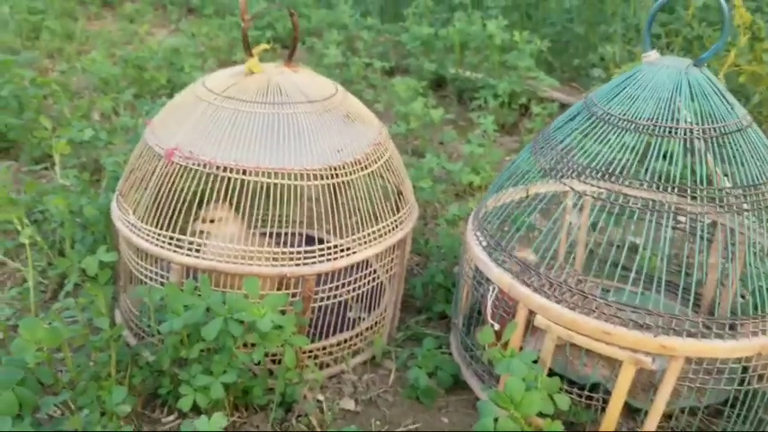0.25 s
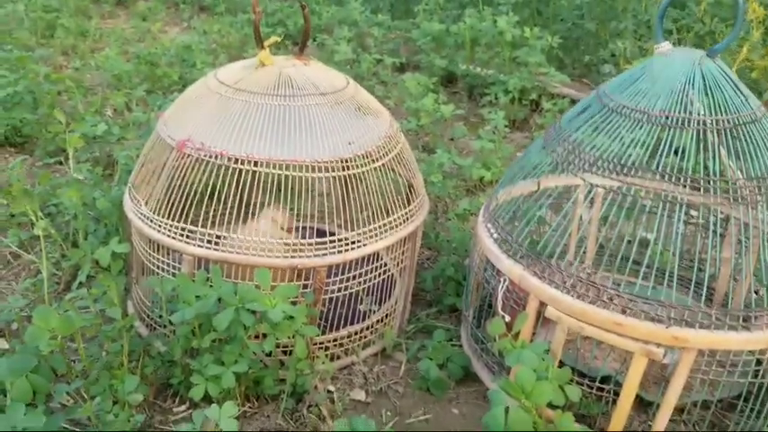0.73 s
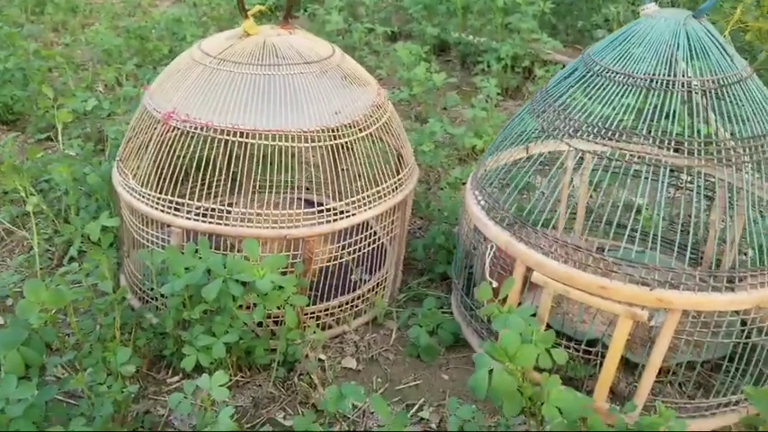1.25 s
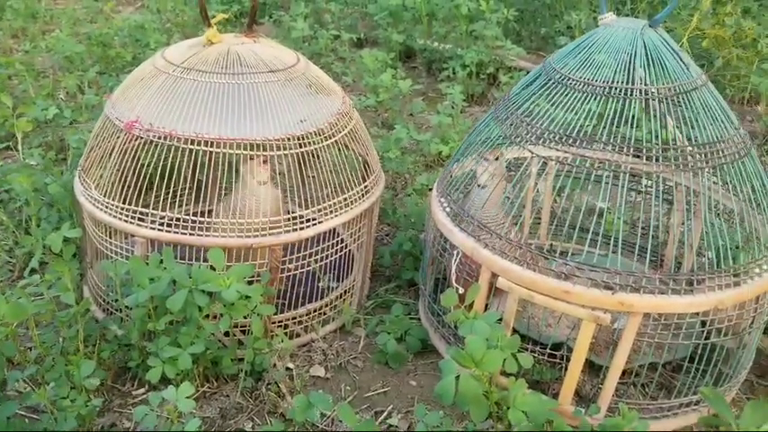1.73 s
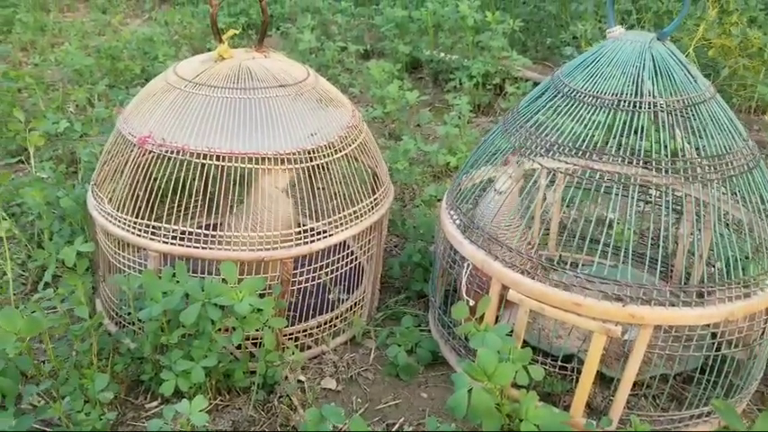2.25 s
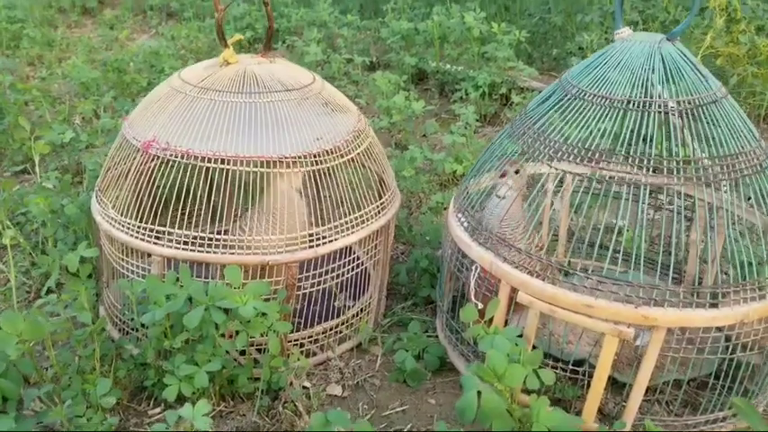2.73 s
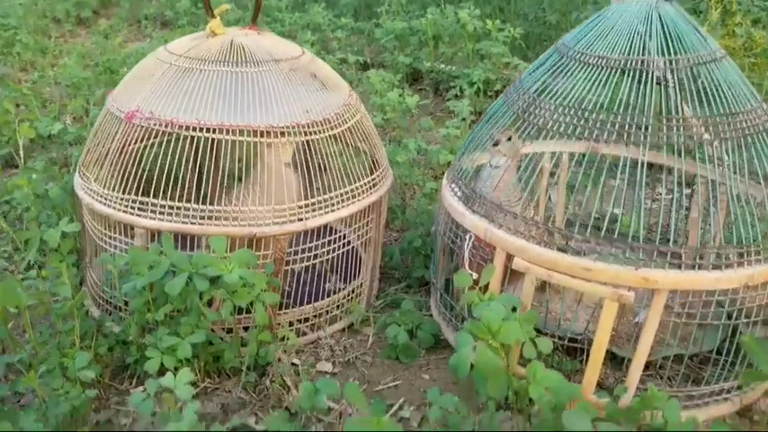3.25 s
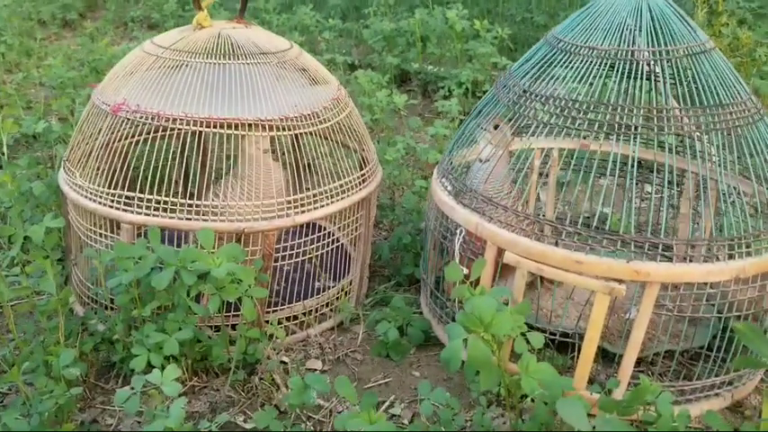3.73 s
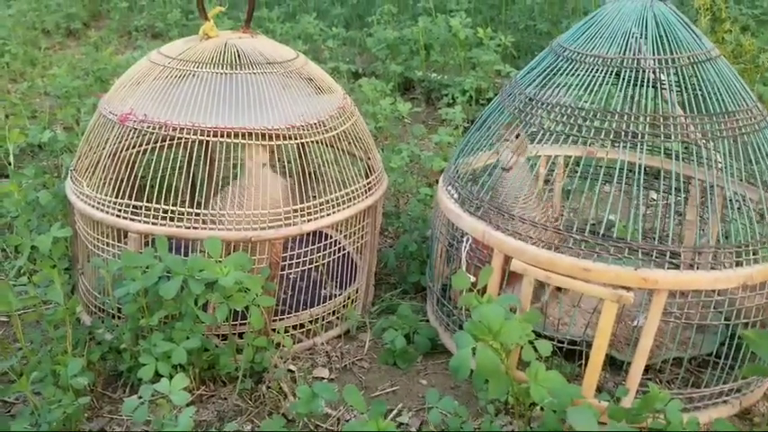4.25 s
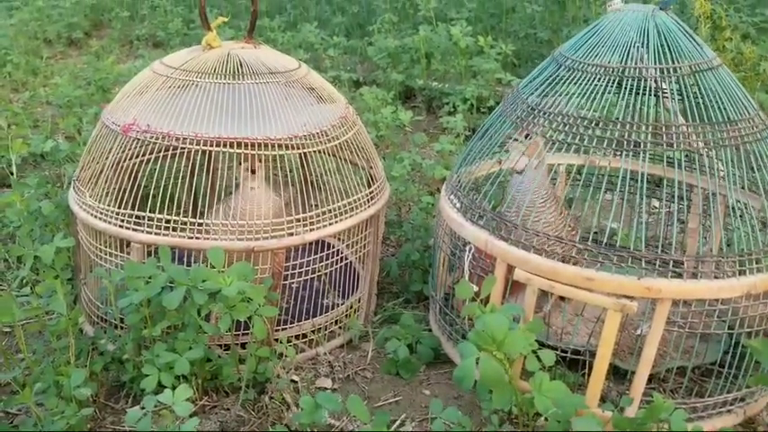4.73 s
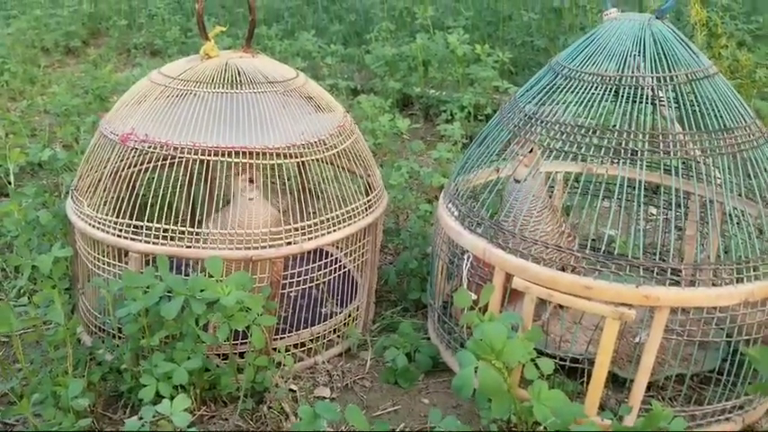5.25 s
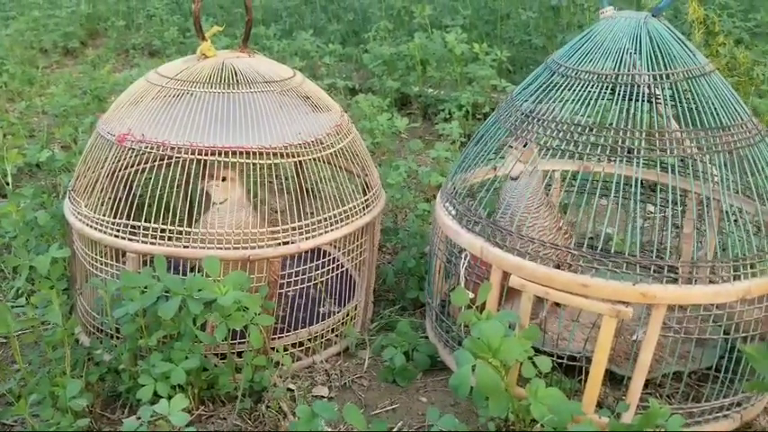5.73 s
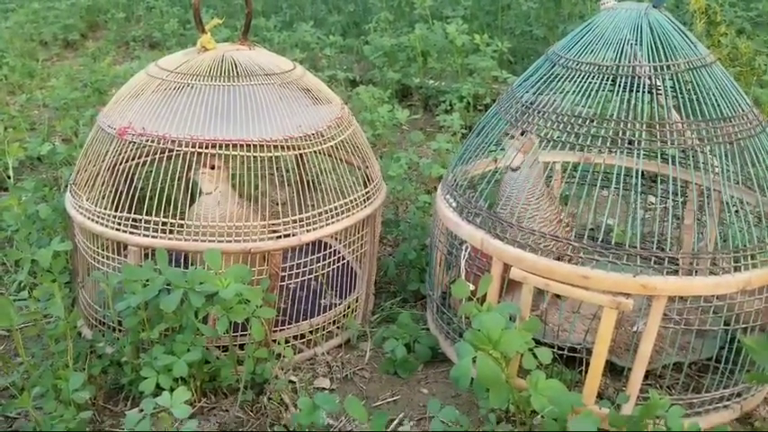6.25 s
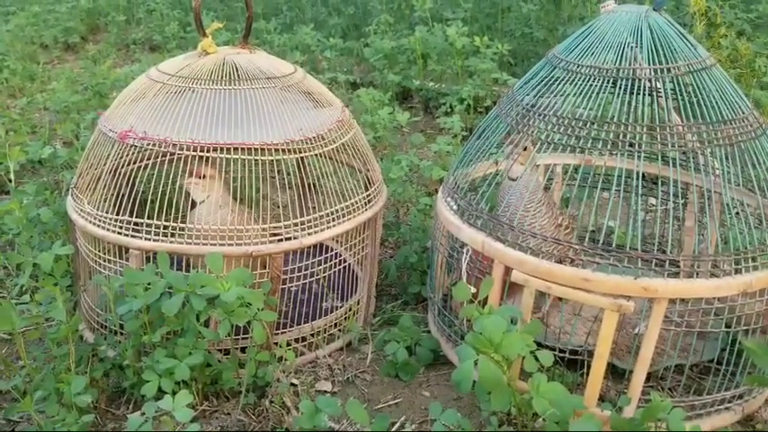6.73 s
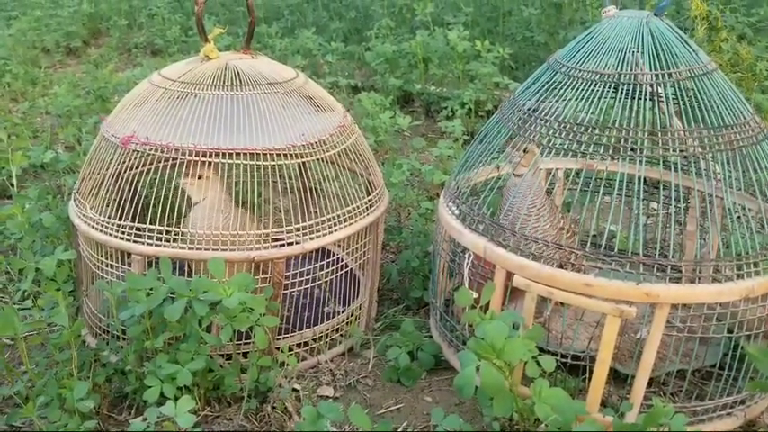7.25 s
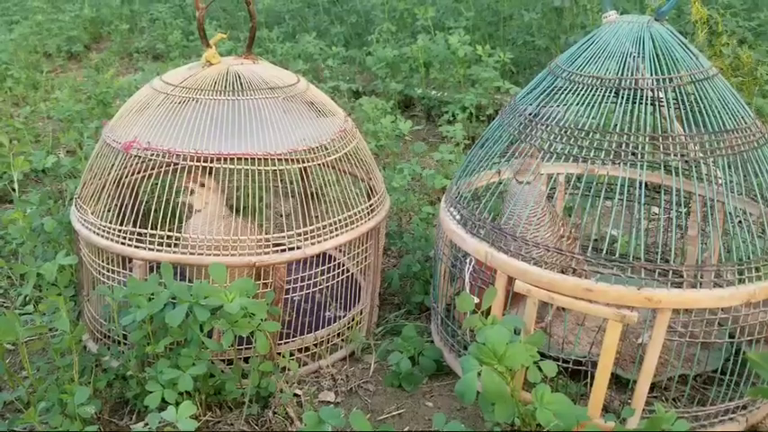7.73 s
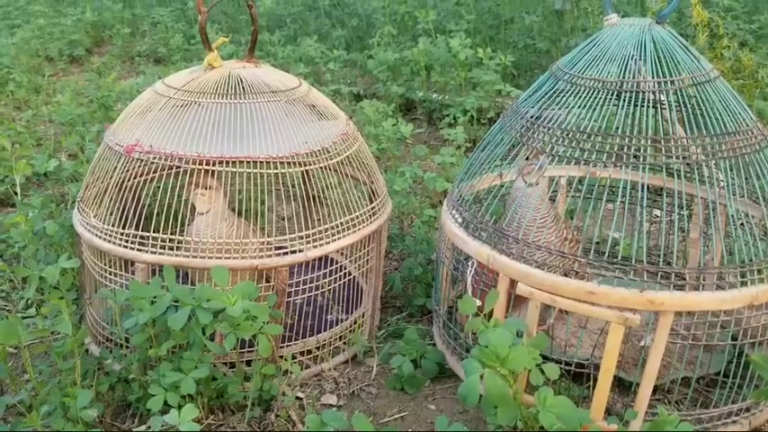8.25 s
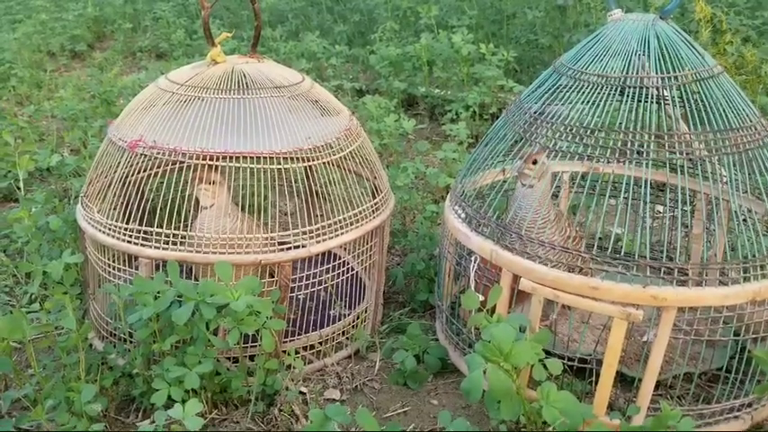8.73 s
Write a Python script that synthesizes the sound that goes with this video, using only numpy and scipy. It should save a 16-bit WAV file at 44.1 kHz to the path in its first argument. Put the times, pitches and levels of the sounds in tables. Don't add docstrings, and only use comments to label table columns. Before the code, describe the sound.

Close stereo outdoor pickup of caged ground birds. The first second holds soft rumble, distant rough caws and dull handling taps. Then a sharp whistle breaks in and a dense duet takes over: piercing piping about twice a second, snapping double cries and quick throaty clucks between. The background drops away beneath the calls. After about seven seconds only spaced piping and thin whistles remain, with slight short echoes from cage and trees.

```python
import sys
import numpy as np
from scipy import signal
from scipy.io import wavfile
from scipy.ndimage import uniform_filter1d

SR = 44100
rng = np.random.default_rng(int(sys.argv[2]) if len(sys.argv) > 2 else 0)


def voltage_ratio(level):
    return 10 ** (np.asarray(level, float) / 20)


def output_pcm(signal):
    pcm = np.clip(np.atleast_2d(signal).T, -1, 1) * 32767
    wavfile.write(sys.argv[1], SR, np.round(pcm).astype(np.int16))


N = 396018

# time_s, rumble_db, air_db
GROUND_LEVELS = [(0, -47.5, -60.5), (.9, -48, -67.5), (1.35, -51.5, -64.5), (2.37, -66, -78.5),
                 (3.05, -58, -66), (3.85, -74, -72.5), (6.9, -70, -74), (7.6, -57, -73.5),
                 (8.98, -55, -72.5)]
# freq_hz, level_db
RUMBLE_SPECTRUM = [(35, -40.5), (70, -21), (110, -11), (220, 1), (400, -13.5), (600, -36)]
# freq_hz, level_db
AIR_SPECTRUM = [(400, 5.5), (850, -7), (1600, -5), (6800, -13.5), (7300, -7), (8500, -7.5), (9000, -40),
                (15500, -54)]
# freq_hz, level_db
ENGINE_ORDERS = [(52, -1.5), (104, -1), (155, -12), (207, -11.5)]
# level_db, t60_s
ECHO_TAILS = [
    (-28, .1),
    (-38, .6),
]

# start_s, length_s, pitch_hz, level_db, dulling_db_per_octave away from 1.6 kHz
CROW_CAWS = [
    (0.027, 0.37, 468.6, -44, -0.5),
    (1.02, 0.35, 494.6, -45, 2.5),
    (4.978, .35, 492, -53, 3.5),
    (7.242, 0.47, 487, -69, 13),
]
# freq_hz, level_db
CROW_SPECTRUM = [(900, -15), (1400, 0.5), (1850, -3.5), (2300, -14), (3700, -17.5), (5500, -14),
                 (8000, -24), (10500, -18)]
CAW_ROUGH, ROUGH_PER_DB, CAW_ARCH, CAW_EDGE_DB = .5, .05, .07, -17
# time_s, pitch_hz, level_db
FAR_CALLS = [
    [(.7, 1900, -53), (.73, 1800, -53), (.78, 1250, -63), (.83, 850, -53)],
    [(8.4, 1960, -66.5), (8.58, 2050, -72)],
]

# start_s, peak_db
KNOCK_EVENTS = [(0.141, -40), (0.215, -34), (0.244, -33), (0.319, -30.5), (0.339, -32), (0.497, -33),
                (0.51, -31), (0.693, -36), (0.707, -33), (0.744, -33.5), (0.822, -37.5), (0.85, -38),
                (1.057, -36), (1.076, -34.5), (1.204, -36), (1.224, -37), (2.948, -36), (3.047, -39.5),
                (3.084, -41.5), (3.204, -39), (3.244, -42), (3.281, -43.5)]
# freq_hz, width_hz, level_db
SHELL_MODES = [(114.4, 120, 1), (325.8, 260, 10), (673, 1800, -3.5), (2380, 2900, -22.5)]

# start_s, length_s, pitch_hz, rise_hz, level_db
LOW_WHISTLES = [(1.16, 0.13, 3790, 53, -13.5), (2.08, 0.058, 3820, 150, -28), (2.78, 0.07, 3750, 260, -21),
                (3.42, 0.14, 3790, 270, -27.5), (4.005, 0.086, 3950, 190, -26.5),
                (4.58, 0.094, 3880, 190, -27.5), (5.15, 0.079, 3900, 123, -24),
                (5.82, 0.048, 3900, 25, -21.5), (6.45, .055, 3900, 250, -19),
                (6.988, 0.19, 3940, 54, -20.5), (7.612, 0.051, 3980, 106, -19),
                (8.205, 0.086, 3860, 258, -19.5), (8.805, 0.076, 3990, 40, -19)]
# start_s, length_s, pitch_hz, level_db
HIGH_WHISTLES = [(1.279, 0.029, 4160, -13.5), (2.092, 0.13, 4200, -25), (2.83, 0.12, 4240, -24.5),
                 (3.531, 0.056, 4370, -27.5), (4.067, 0.12, 4350, -28.5), (4.631, 0.13, 4340, -26),
                 (5.2, 0.12, 4270, -24), (5.86, 0.14, 4330, -25), (6.5, 0.122, 4430, -27),
                 (7.145, 0.05, 4400, -27), (7.647, 0.17, 4360, -16.5), (8.26, .13, 4380, -20.5),
                 (8.841, .16, 4386, -22)]
# low_pan_db, low_lead_rad, high_pan_db, high_lead_rad (pan is left minus right)
WHISTLE_SIDES = [(6.5, -0.35, -4, -.9), (8, -0.28, -11.5, .3), (0.5, -0.435, 1.5, -0.15),
                 (3, -0.19, 0.5, -0.85), (1, 0.32, 5, -1.8), (2, 0, -1, -1.2), (-5, 0, 6, -1.08),
                 (-1, 0.11, -0.5, -1.6), (-2.5, 0.34, -6, 1), (0, 0.38, -9, 0.7), (1.5, .4, -10.5, -1.7),
                 (1.5, .4, -19, 0.28), (4, 0.25, -33, 0.94)]
# freq_hz, level_db re whistle
BREATH_SPECTRUM = [(500, -50.5), (1500, -42.5), (3300, -41.5), (4300, -22), (5200, -28.5), (6200, -42),
                   (8500, -48.5), (15000, -46.5)]
# start_s, peak_db
THROAT_THUMPS = [(1.142, -23), (2.062, -31.5), (2.751, -37), (3.397, -40.5), (3.986, -48), (4.559, -51),
                 (5.12, -39), (6.428, -40.5), (6.962, -44), (7.591, -30.5), (8.176, -43), (8.782, -29.5)]
# attack_s, release_s, scoop_hz, fade_db
LOW_SHAPE, HIGH_SHAPE = (0.0056, 0.0448, 170, 3), (.022, 0.0636, 59, 1)
HIGH_RISE_HZ, WHISTLE_SCOOP_S, WAVER = -38, .006, .005

# start_s, first_hz, sag_hz, level_db
PIPE_NOTES = [(1.638, 2970, 16, -10.5), (2.174, 2995, 25, -14), (2.642, 3008, 23, -12.5),
              (3.161, 3013, 12, -11), (3.707, 3010, 16, -15), (4.271, 3011, 15, -13.5),
              (4.82, 3023, 19, -13), (5.361, 3006, 32, -12), (5.877, 3025, 66, -12),
              (6.426, 2996, 51, -11.5), (7.145, 2958, 37, -13), (7.791, 2949, 22, -9.5)]
# p2_db, p3_db, p4_db, p5_db
PIPE_UPPER = [(-9.0, -18.0, -24.0, -27.0), (-9.0, -23.0, -26.0, -30.0), (-9.0, -26.0, -32.0, -32.0),
              (-17.0, -25.0, -24.0, -31.0), (-13.0, -22.0, -23.0, -25.0), (-12.0, -17.0, -18.0, -26.0),
              (-15.0, -16.0, -16.0, -21.0), (-21.0, -19.0, -15.0, -23.0), (-17.0, -17.0, -16.0, -23.0),
              (-15.0, -16.0, -14.0, -25.0), (-12.0, -16.0, -13.0, -28.0), (-16.0, -16.0, -16.0, -28.0)]
# p1_db, p2_db, p3_db, p4_db, p5_db
PIPE_PANS = [(-8.0, -17.0, 3.0, -2.0, -8.0), (-9.0, -18.0, 5.0, 1.0, -5.0), (-9.0, -19.0, 7.0, 10.0, -7.0),
             (-7.0, -4.0, 5.0, -4.0, -14.0), (-4.0, -4.0, -8.0, -1.0, -1.0), (-6.0, -3.0, -5.0, -3.0, -1.0),
             (-7.0, 1.0, -4.0, -5.0, -4.0), (-6.0, 6.0, -5.0, -4.0, -2.0), (-5.0, 0.0, 3.0, -3.0, -5.0),
             (-6.0, -1.0, 3.0, -2.0, -3.0), (-6.0, -1.0, 6.0, 1.0, 7.0), (-10.0, -2.0, 11.0, 1.0, 7.0)]
PIPE_LEADS = [(1.3, -0.4, 1.0, -1.2, -1.7), (1.0, -0.7, 2.0, -0.4, 2.4), (0.8, -1.7, 3.1, -1.1, 3.1),
              (0.9, -2.6, 0.1, 1.3, -2.8), (1.1, 2.6, 1.0, -2.5, -0.2), (1.2, 3.0, 2.8, -3.1, -0.9),
              (1.8, -3.1, 2.6, -2.8, -0.8), (2.0, -0.6, 2.2, -2.9, -0.2), (2.6, -0.2, -2.8, -1.5, 1.7),
              (2.6, 0.0, -2.6, -1.1, 1.2), (2.7, 1.2, -2.8, -0.4, 2.3), (2.6, 0.8, 3.1, -1.1, 1.3)]
PIPE_MIDLINES = [-30, -45, -50, -45, -45, -42, -38, -45, -45, -45, -45, -50]
PIPE_RASP = [-13, 0, -3, -10, -25.5, -14, -23.5, -15.5, -15.5, -25.5]
PIPE_S, PIPE_LEAD_DB, PIPE_TAIL_DB = .086, -8.5, -19
PIPE_FADE_DB, FADE_DB_PER_S = -5.5, 0.86

# first_s, second_s, pitch_hz, first_db, second_db
CRY_NOTES = [(1.476, 1.513, 2614, -14, -15), (2.275, 2.314, 2697, -11, -17), (2.806, 2.849, 2693, -10, -13),
             (3.354, 3.395, 2682, -9, -16.5), (3.921, 3.963, 2683, -9.5, -16.5),
             (4.465, 4.508, 2677, -9, -15), (5.506, 5.555, 2660, -7.5, -12.5),
             (6.054, 6.1, 2670, -7, -11.5)]
# open_db, open_s, break_db, snap_db, second_length_s
CRY_RASPS = [(-15.5, .059, -20, -17, .04), (-22, .07, -24, -22, .045), (-17, .048, -24, -19, .047),
             (-16.5, .053, -23, -22, .047), (-18, .05, -24, -22, .047), (-16, .05, -24, -20, .047),
             (-15.5, .054, -23, -21, .047), (-14.5, .05, -23, -21, .047)]
# p2_db, p3_db, p4_db, p5_db
CRY_FIRST_UPPER = [(-2.0, -26.0, -22.0, -17.0), (-8.0, -37.0, -30.0, -31.0), (-17.0, -38.0, -35.0, -41.0),
                   (-13.0, -37.0, -36.0, -36.0), (-13.0, -42.0, -29.0, -32.0), (-13.0, -40.0, -34.0, -30.0),
                   (-16.0, -41.0, -29.0, -27.0), (-16.0, -37.0, -36.0, -32.0)]
# p2_db, p3_db, p4_db, p5_db
CRY_SECOND_UPPER = [(1.0, -19.0, -12.0, -16.0), (-7.0, -32.0, -20.0, -27.0), (-14.0, -28.0, -23.0, -37.0),
                    (-15.0, -28.0, -18.0, -26.0), (-15.0, -28.0, -19.0, -25.0),
                    (-17.0, -27.0, -22.0, -26.0), (-20.0, -26.0, -21.0, -25.0),
                    (-19.0, -26.0, -22.0, -21.0)]
# p1_db, p2_db, p3_db, p4_db, p5_db
CRY_PANS = [(-7.0, -22.0, 4.0, -9.0, -16.0), (-11.0, -18.0, -6.0, -0.0, -6.0),
            (-9.0, -3.0, -7.0, -2.0, -11.0), (-6.0, -14.0, -3.0, 7.0, -4.0), (-5.0, -10.0, -1.0, 4.0, -4.0),
            (-6.0, -6.0, -3.0, 7.0, -4.0), (-5.0, -6.0, -7.0, 5.0, -5.0), (-4.0, -7.0, -4.0, 6.0, -4.0)]
CRY_LEADS = [(-0.3, 0.8, -2.6, -2.8, -1.7), (-1.0, -0.2, 1.1, 3.0, 2.3), (-1.0, -1.2, -1.9, -3.0, 2.6),
             (-0.7, -1.1, 0.8, -0.8, -2.1), (-0.6, -0.8, -0.1, -1.1, -2.2), (-0.9, -0.9, -0.9, -3.0, 1.2),
             (-0.9, -1.4, -1.6, 2.8, 1.6), (-0.8, -2.0, -1.2, 2.9, 1.7)]
CRY_RASP = [-16, -2, -6, -12.5, -28, -28, -20.5, -32.5, -25.5, -24.5]
BREAK_S, FIRST_SAG_HZ, FALL_HZ, FALL_DB = .0145, 15, 230, -3

# start_s, peak_db of the lowest partial, effort_db of the second partial above it
CLUCK_EVENTS = [(1.7449, -23, -3.5), (1.831, -27.5, -12), (1.9125, -30.5, -15.5), (1.9944, -39, -28.5),
                (2.4863, -31.5, 14.5), (2.5787, -28.5, 8.5), (3.026, -30, 14.5), (3.1201, -26.5, 7),
                (3.2046, -30.5, -0.5), (3.571, -24, 6.5), (3.6652, -25, 3.5), (3.7524, -32, 0.5),
                (4.136, -24, 7), (4.225, -22.5, 1), (4.3181, -29, -6.5), (4.6808, -23, 6),
                (4.7707, -23, 2.5), (4.8651, -28, -7.5), (4.9282, -26.5, -16), (4.994, -26, -19.5),
                (5.0868, -30, -28), (5.7144, -25, 5), (5.802, -22, -4), (6.2684, -25, 7.5),
                (6.3582, -22, 0.5), (6.4441, -30, -12.5), (6.5096, -29.5, -10.5), (6.5763, -26, -15.5),
                (6.6635, -31, -21.5), (6.746, -34.5, -40)]
# slide_db, ring_db
CLUCK_COLOURS = [(0, 4), (-8, 9), (-8, 12), (-8, 20), (-8, 3), (-8, 2), (1, 0), (0, 0), (-3, 0), (1, 0),
                 (1, 0), (-3, 0), (1, -1), (1, -1), (-3, -1), (1, -1), (1, -1), (-3, -1), (-5, 1), (-5, 3),
                 (-5, 5), (1, -2), (1, -2), (1, -3), (1, -3), (-3, -3), (-5, 0), (-5, 0), (-5, 3), (-5, 9)]
CLUCK_S, CLUCK_S_PER_DB = .047, .0005
UPPER_DB, UPPER_PER_DB = -19, 0.8741

# hook_hz, hook_s, dive_hz, accent_db, breath_db
PIPE_EDGE = (25, .005, 170, .5, -37)
FIRST_EDGE = (150, .002, 300, .5, -31)
SECOND_EDGE = (120, .002, 110, 3, -30)
CRY_FACING_DB, FACING_DB, BRIGHT = -11.5, -37, 0.36
SWING, SWING_PER_DB = .05, .013


def evened(x):
    return x / np.sqrt(np.mean(abs(x) ** 2) + 1e-20)


def wandering(count, span):
    noise = rng.standard_normal(count)
    return evened(uniform_filter1d(uniform_filter1d(noise, span), span))


def filtered(x, order, hz, kind):
    return signal.sosfilt(signal.butter(order, hz, kind, fs=SR, output="sos"), x)


def read(points, hz):
    f, value = np.transpose(points)
    return np.interp(np.log(hz + 1), np.log(f + 1), value)


def unroll(rows):
    s, *columns = np.transpose(rows)
    t = np.arange(s[0], s[-1], 1 / SR)
    return [np.interp(t, s, c) for c in columns]


def add(mix, start_s, sound):
    part = mix[:, round(start_s * SR):][:, :sound.shape[1]]
    part += sound[:, :part.shape[1]]


def hump(length_s, rise, power):
    u = np.linspace(0, 1, round(length_s * SR))
    bend = np.log(.5) / np.log(np.clip(rise, .05, .95))
    return abs(np.sin(np.pi * u ** bend)) ** power


def partial(hz, rough=0., width_hz=300.0, pan_db=0., lead_rad=0., apart=0., loose=False):
    apart, rough = np.clip(apart, 0, 1), np.clip(rough, 0, 1)
    noise = np.exp(2j * np.pi * rng.random((2, len(hz) + 300), np.float32))
    r = np.exp(-np.pi * width_hz / SR)
    shiver = evened(signal.lfilter([1], [1, -2 * r, r * r], noise)[:, 300:])
    shiver[0] = np.sqrt(1 - apart) * shiver[1] + np.sqrt(apart) * shiver[0]
    carrier = np.exp(2j * np.pi * (np.cumsum(hz) / SR + loose * rng.random()))
    line = carrier * (np.sqrt(1 - rough) + np.sqrt(rough) * shiver)
    sides = np.array([voltage_ratio(pan_db) * np.exp(1j * lead_rad), 1])
    return 2 * (line * sides[:, None]).real / np.linalg.norm(sides)


def breath(count, low_hz):
    noise = rng.standard_normal((3, count))
    return evened(filtered(noise[:2] + noise[2], 2, low_hz, "high"))


def hiss(spectrum, patchy_db, same):
    frames, hz = N // 512 + 5, np.fft.rfftfreq(1024, 1 / SR)
    a, b, c, d, patches = rng.standard_normal((frames, 513, 5), np.float32).T
    patches = evened(uniform_filter1d(uniform_filter1d(patches, 4, 0), 8, 1))
    same = np.clip(same, -1, 1)
    left, other = a + 1j * b, c + 1j * d
    z = np.array([left, same * left + np.sqrt(1 - same ** 2) * other])
    z *= voltage_ratio(read(spectrum, hz)[:, None] + patchy_db * patches)
    return signal.istft(z, nperseg=1024, noverlap=512)[1][:, :N]


def background():
    rumble_db, air_db = (np.pad(c, (0, N), "edge")[:N] for c in unroll(GROUND_LEVELS))
    turn = 2 * np.pi * np.arange(N) / SR - np.array([[0], [.012]])
    drift = 3.5 * np.sin(0.13 * turn)
    hum = sum(voltage_ratio(db) * np.sin(hz * turn + drift * hz / 52) for hz, db in ENGINE_ORDERS)
    low = voltage_ratio(-2.5) * hum + voltage_ratio(-3.0) * evened(hiss(RUMBLE_SPECTRUM, 1.2, 0.27))
    air = evened(hiss(AIR_SPECTRUM, 1.9, .2))
    return voltage_ratio(rumble_db + 1.0) * low + voltage_ratio(air_db + 11.5) * air


def field(x):
    t = np.arange(SR // 2) / SR
    taps = rng.choice([-1., 1.], (2, len(t))) * (rng.random((2, len(t))) < .05)
    tail = 0
    for db, t60_s in ECHO_TAILS:
        one = taps * voltage_ratio(-60 * t / t60_s) * (t > .003)
        tail = tail + voltage_ratio(db) * one / np.linalg.norm(one[0])
    tail = filtered(tail, 2, 7000, "low")
    return signal.oaconvolve(x, tail, axes=1)[:, :N]


def crow():
    mix = np.zeros((2, N))
    for start_s, length_s, top_hz, db, dull_db in CROW_CAWS:
        off = np.linspace(-1, 1, round(length_s * SR)) ** 2
        hz = top_hz * (1 - CAW_ARCH * off)
        rough = min(CAW_ROUGH + ROUGH_PER_DB * dull_db, .95)
        caw = voltage_ratio(-21 - 2.5 * dull_db) * breath(len(hz), 9500.)
        for k in range(1, 24 - round(dull_db)):
            mean_hz = k * hz.mean()
            level_db = read(CROW_SPECTRUM, mean_hz) - dull_db * abs(np.log2(mean_hz / 1600))
            caw = caw + voltage_ratio(level_db) * partial(k * hz, rough ** (3 / k), 20. + 75.2 * k, apart=0.42)
        add(mix, start_s, voltage_ratio(db + CAW_EDGE_DB * off ** 3) * caw)
    return mix


def far_birds():
    mix = np.zeros((2, N))
    for rows in FAR_CALLS:
        hz, db = unroll(rows)
        call = partial(hz, 0.94, 98.0) + voltage_ratio(-6) * partial(2 * hz, 0.53, 69.0)
        add(mix, rows[0][0], voltage_ratio(db) * call * signal.windows.tukey(len(hz), .2))
    return mix


def knocks():
    t, mix = np.arange(1500) / SR, np.zeros((2, N))
    for start_s, db in KNOCK_EVENTS:
        ring = 0
        for hz, width_hz, mode_db in SHELL_MODES:
            detune = rng.uniform(0.83, 1.66, (2, 1))
            decay = np.exp(-np.pi * width_hz * t)
            ring = ring + voltage_ratio(mode_db) * decay * np.sin(2 * np.pi * hz * detune * t)
        add(mix, start_s, voltage_ratio(db + np.array([[4.], [-5.]])) * ring)
    return mix


def whistled_line(length_s, hz, rise_hz, attack_s, release_s, scoop_hz, fade_db):
    t = np.arange(0, length_s, 1 / SR)
    waver = wandering(9000, 500)[:len(t)]
    pitch_hz = hz * (1 + WAVER * waver) + rise_hz * t / length_s
    pitch_hz = pitch_hz - scoop_hz * np.exp(-t / WHISTLE_SCOOP_S)
    gate = np.clip(np.minimum(t / attack_s, (length_s - t) / release_s), 0, 1)
    return pitch_hz, voltage_ratio(fade_db * (t / length_s - .5)) * gate


def whistler():
    mix = np.zeros((2, N))

    def sing(start_s, db, hz, shape, side, rough):
        tone = partial(hz, rough, 30., *side) + voltage_ratio(-36) * partial(2 * hz, .2, 100.)
        add(mix, start_s, voltage_ratio(db) * tone * shape)

    for low, high, sides in zip(LOW_WHISTLES, HIGH_WHISTLES, WHISTLE_SIDES):
        low_s, low_length_s, low_hz, rise_hz, low_db = low
        high_s, high_length_s, high_hz, high_db = high
        low_side, high_side = sides[:2], sides[2:]
        sing(low_s, low_db, *whistled_line(low_length_s, low_hz, rise_hz, *LOW_SHAPE), low_side, .06)
        hz, shape = whistled_line(high_length_s, high_hz, HIGH_RISE_HZ, *HIGH_SHAPE)
        sing(high_s, high_db, hz, shape, high_side, .05)
        flicker = partial(hz - 320, .9, 45., *low_side) * signal.windows.tukey(len(hz), .3)
        add(mix, high_s, voltage_ratio(high_db - 24 + 1.4 * high_s) * shape * flicker)
    effort = np.sqrt(abs(uniform_filter1d((mix ** 2).mean(0), 1300)))
    mix += voltage_ratio(-1.5) * effort * hiss(BREATH_SPECTRUM, 0.6, 0.35) / 2
    for start_s, db in THROAT_THUMPS:
        shape = hump(.03, 0.26, 1.0)
        thump = partial(np.linspace(250, 170, len(shape)), 0.53)
        add(mix, start_s - .004, voltage_ratio(db - 7.5) * shape * thump)
    return mix


def rasp(hz, levels_db, pan_db, lead_rad, rough, beat_hz):
    wander = wandering(len(hz) + 400, 200)[200:-200]
    hz = hz * (1 + (.015 + .07 * rough) * wander)
    flap = 0.58 * np.cos(2 * np.pi * np.cumsum(beat_hz * (1 + .1 * wander)) / SR)
    total = 0
    for k, db in enumerate(levels_db, 1):
        turned = min(k / 2, 1.1)
        width_hz = 60. + 300 * rough + 110. * k
        line = partial(k * hz, rough ** (1.5 / k), width_hz, pan_db * turned, lead_rad * turned, 0.25 * k, True)
        total = total + voltage_ratio(db) * (1 + flap * min(k / 3, 1)) * line
    return total


def clear_note(row, head, bend, edge):
    _, length_s, first_hz, last_hz, db, change_db = row
    upper_db, pans_db, leads_rad, midline_db, lift_db = head
    hook_hz, hook_s, dive_hz, accent_db, breath_db = edge
    u = np.linspace(0, 1, round(length_s * SR))
    hz = first_hz + (last_hz - first_hz) * 1.3 * u ** bend
    hz = hz - dive_hz * u ** 18 + hook_hz * np.exp(-u * length_s / hook_s)
    clear = voltage_ratio(midline_db) * partial(1.5 * hz, .1, 90., pans_db[0], leads_rad[0])
    for k, (level_db, pan_db, lead_rad) in enumerate(zip([0, *upper_db], pans_db, leads_rad), 1):
        clear = clear + voltage_ratio(level_db) * partial(k * hz, 0.00076 * k * k, 490.0, pan_db, lead_rad)
    accent = voltage_ratio(accent_db * np.exp(-((u - .16) / .13) ** 2))
    clear = accent * clear + voltage_ratio(breath_db + 1.5 * lift_db) * breath(len(u), 5200.)
    contour_db = db + change_db * (u - .5) + 1 - 1.3 * (2 * u - 1) ** 4
    return -clear * voltage_ratio(contour_db) * signal.windows.tukey(len(u), 0.012 / length_s)


def note(mix, row, head, rasp_db, levels_db, lead_s, tail_s, gap_s, bend, edge, catch):
    start_s, length_s, first_hz = row[:3]
    _, pans_db, leads_rad, _, lift_db = head
    side = pans_db[0], leads_rad[0]
    add(mix, start_s - .002, clear_note(row, head, bend, edge))
    lifts = [-.8] + [1] * 3 + [-.2] * (len(levels_db) - 4)
    levels_db = [level_db + lift * lift_db for level_db, lift in zip(levels_db, lifts)]

    catch = catch * np.clip(1 - lift_db / 8, 0, 1)
    before = hump(lead_s + .003, .57, .4)
    t = np.arange(len(before)) / SR
    before = before * (1 - .7 * catch * np.exp(-((t - lead_s + 0.012) / .007) ** 2))
    before = before * (1 - catch * np.exp(-t / .012))
    swing = SWING + SWING_PER_DB * max(lift_db, 0)
    arch = 1.03 + swing * np.cos(2 * np.pi * np.linspace(0, 1, len(before)) ** 1.9)
    rough = np.clip(.3 + .06 * lift_db, .15, .8)
    opening = rasp(first_hz / 2 * arch, levels_db, *side, rough, first_hz / 4)
    add(mix, start_s - lead_s, voltage_ratio(rasp_db[0]) * before * opening)

    after = hump(tail_s, .17, 1.1)
    droop = np.linspace(1.12, .9, len(after))
    closing = rasp(first_hz / 2 * droop, levels_db, *side, .3, first_hz / 4)
    add(mix, start_s + length_s + gap_s, voltage_ratio(rasp_db[1]) * after * closing)


def cluck(db, effort_db, pan_db, slide_db, ring_db):
    length_s = CLUCK_S + CLUCK_S_PER_DB * effort_db
    shape = hump(length_s, 0.42, 1.48)
    u = np.linspace(0, 1, len(shape))
    upper_db = UPPER_DB + UPPER_PER_DB * effort_db
    offsets_db = 2.5, 0.5 + ring_db, -10, -8.5, -9, -14.5, -11, -11
    levels_db = [-5, effort_db - 0.5] + [upper_db + d for d in offsets_db]
    rough = np.clip(.45 - .025 * effort_db, .2, .95)
    body = shape * rasp(1530 - 800 * (u - .5) ** 2, levels_db, pan_db, -.8, rough, 430.)
    down_hz = 2950 - 1300 * u
    slide = partial(down_hz, .25, 150., pan_db * 0.85, -1.5)
    slide = slide + voltage_ratio(-16.5) * partial(2 * down_hz, .3, 200., pan_db, -1.17)
    slide = voltage_ratio(slide_db - 4 + 0.693 * effort_db) * hump(length_s, 0.8, 1.4) * slide
    return voltage_ratio(db) * (body + slide)


def clucks(mix):
    cry_s = [row[0] for row in CRY_NOTES]
    cry_pan_db = [row[0] for row in CRY_PANS]
    for (start_s, db, effort_db), colour in zip(CLUCK_EVENTS, CLUCK_COLOURS):
        pan_db = np.interp(start_s, cry_s, cry_pan_db)
        add(mix, start_s - .005, cluck(db, effort_db, pan_db, *colour))


def cries(mix):
    tables = CRY_NOTES, CRY_RASPS, CRY_FIRST_UPPER, CRY_SECOND_UPPER, CRY_PANS, CRY_LEADS
    for cry, rasps, first_upper_db, second_upper_db, pans_db, leads_rad in zip(*tables):
        first_s, second_s, hz, first_db, second_db = cry
        open_db, open_s, break_db, snap_db, fall_s = rasps
        lift_db = 1.3 * BRIGHT * (first_upper_db[0] - CRY_FACING_DB)
        side = pans_db, leads_rad, -42., lift_db
        first = first_s, second_s - first_s - BREAK_S, hz, hz - FIRST_SAG_HZ, first_db - 1, 0.
        note(mix, first, (first_upper_db, *side), (open_db, break_db), CRY_RASP,
             open_s, .014, -.003, 1.2, FIRST_EDGE, .8)
        second = second_s, fall_s, hz, hz - FALL_HZ, second_db, FALL_DB
        note(mix, second, (second_upper_db, *side), (break_db + 3, snap_db), CRY_RASP,
             .012, .022, .0015, 1.6, SECOND_EDGE, 0.)


def piping(mix):
    tables = PIPE_NOTES, PIPE_UPPER, PIPE_PANS, PIPE_LEADS, PIPE_MIDLINES
    for (start_s, hz, sag_hz, db), upper_db, pans_db, leads_rad, midline_db in zip(*tables):
        row = start_s, PIPE_S, hz, hz - sag_hz, db, PIPE_FADE_DB + FADE_DB_PER_S * start_s
        lift_db = BRIGHT * (upper_db[0] + upper_db[1] - FACING_DB)
        head = upper_db, pans_db, leads_rad, midline_db, lift_db
        note(mix, row, head, (db + PIPE_LEAD_DB, db + PIPE_TAIL_DB), PIPE_RASP,
             .036, 0.024, -0.0045, 1.0, PIPE_EDGE, 0.)


def pair():
    mix = np.zeros((2, N))
    clucks(mix)
    cries(mix)
    piping(mix)
    return filtered(mix, 2, 480, "high")


def scene():
    near = whistler() + pair()
    return background() + crow() + far_birds() + knocks() + near + field(near)


def top_cut(x):
    return signal.sosfilt(signal.butter(12, 16480, fs=SR, output="sos"), x)


def record(dry):
    shaved = dry - dry / (1 + abs(dry / .84) ** 8) ** (1 / 8)
    limited = dry - filtered(shaved, 2, 700, "high")
    limited = filtered(limited, 3, 42, "high")
    mix = signal.sosfilt(signal.cheby2(12, 50, 16100, fs=SR, output="sos"), limited)
    return top_cut(mix)


dry = scene()
out = record(dry)
output_pcm(out)
```